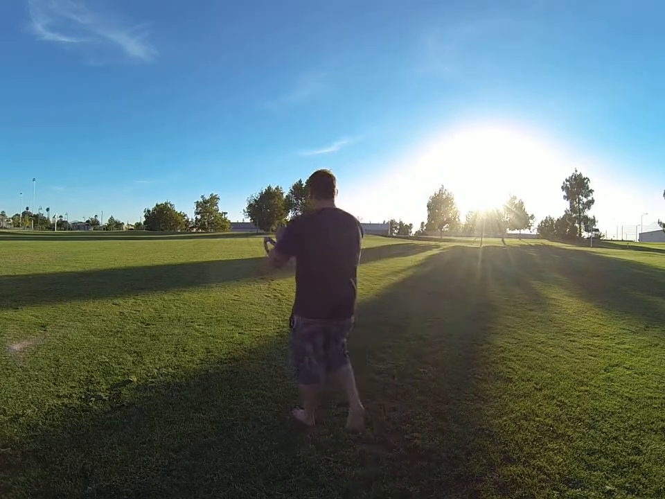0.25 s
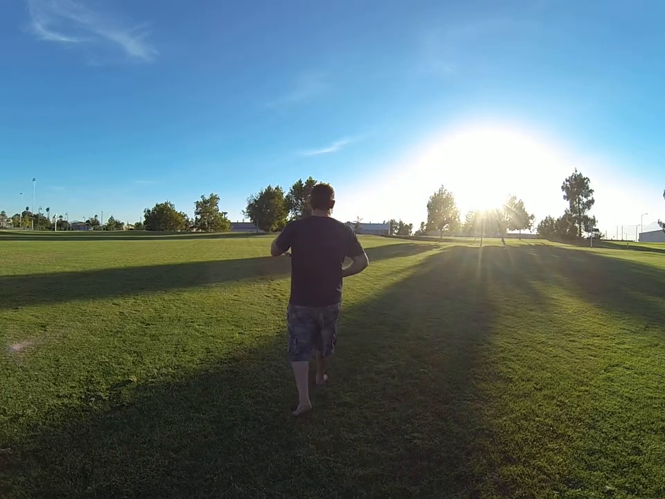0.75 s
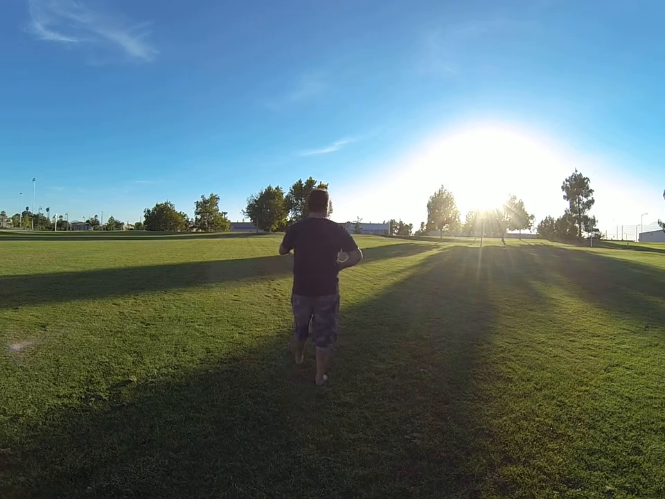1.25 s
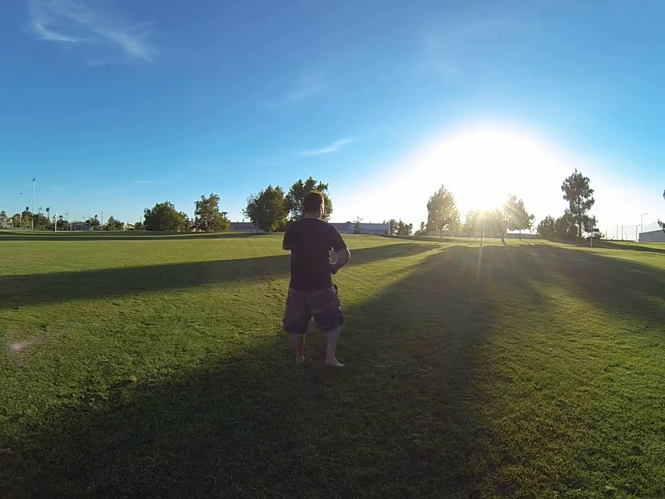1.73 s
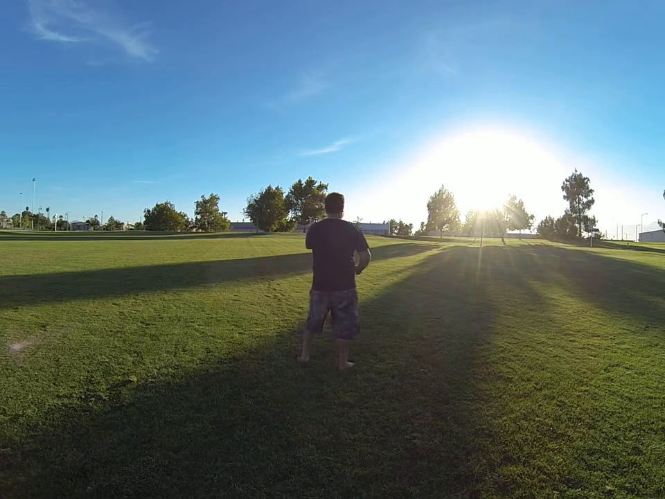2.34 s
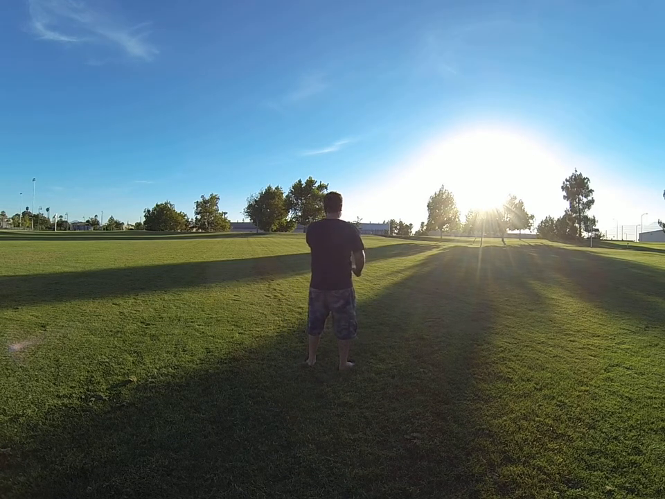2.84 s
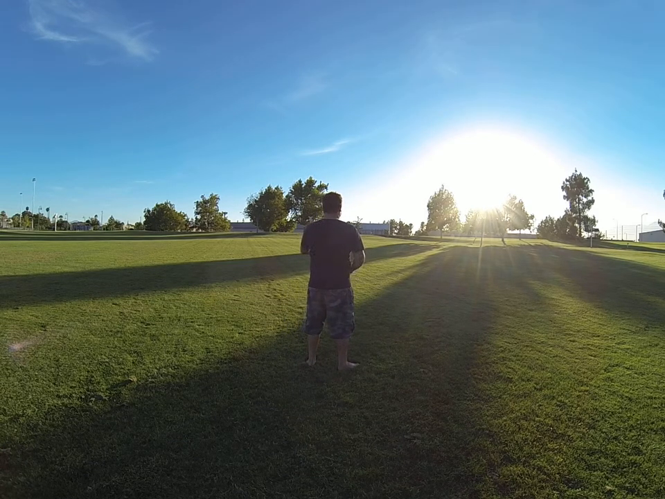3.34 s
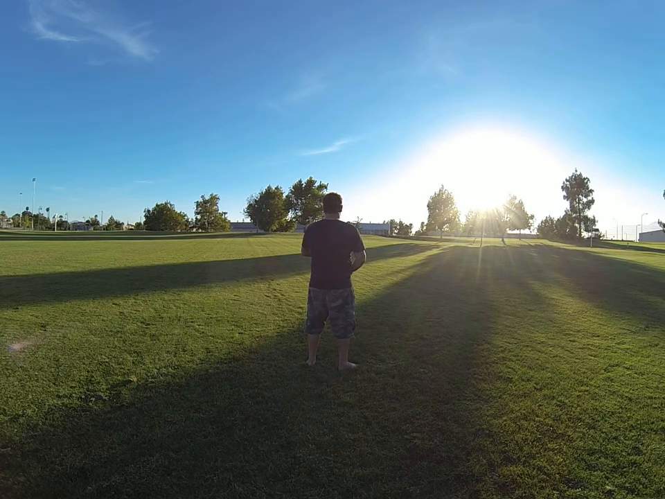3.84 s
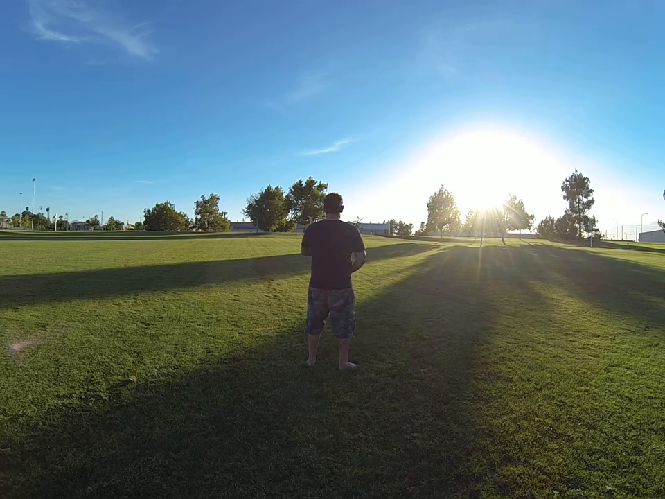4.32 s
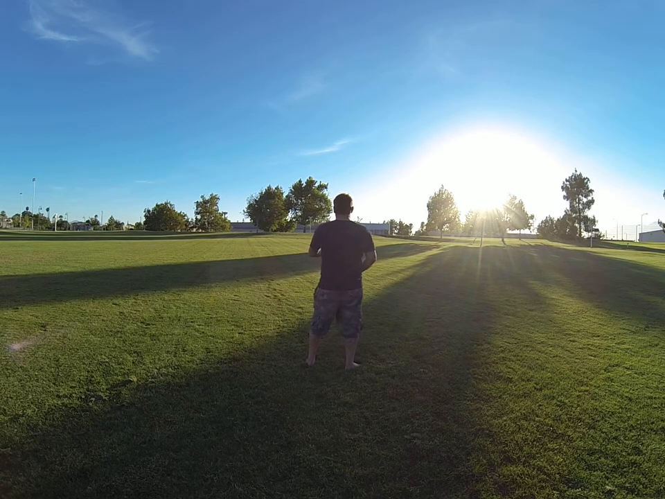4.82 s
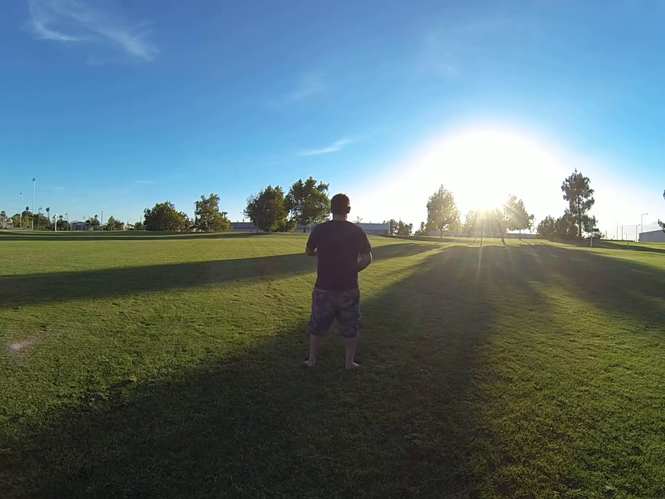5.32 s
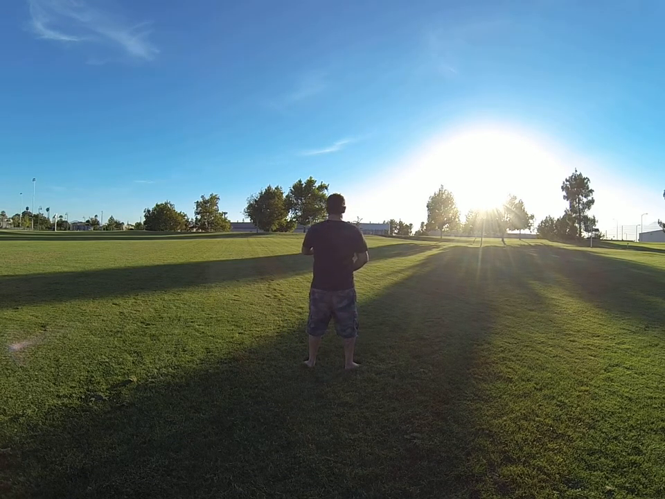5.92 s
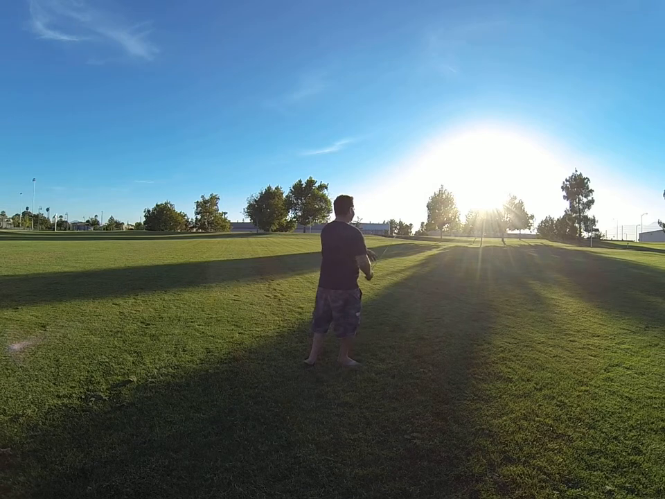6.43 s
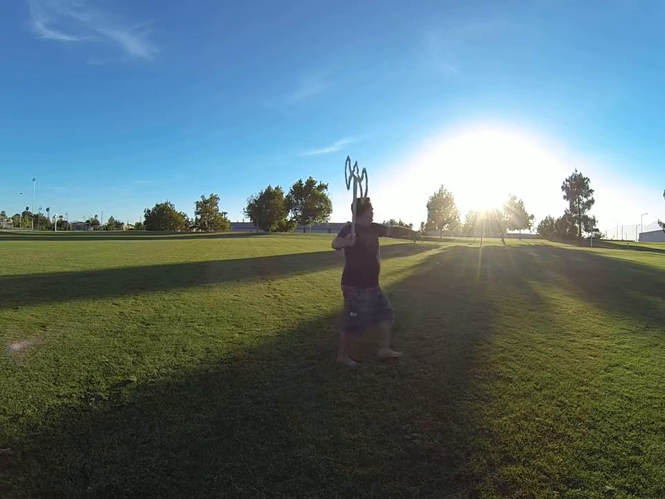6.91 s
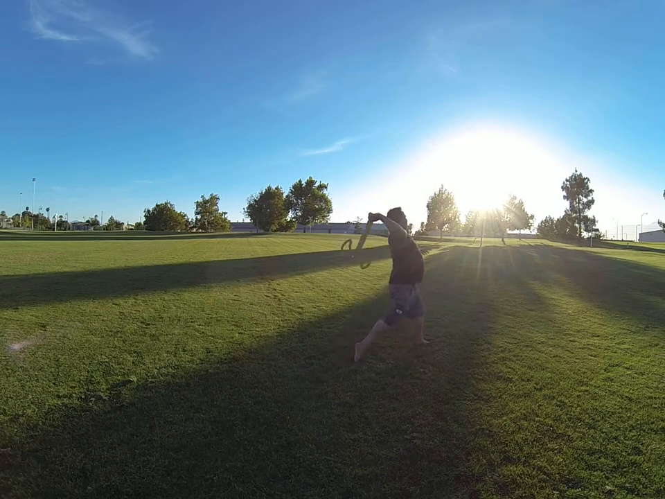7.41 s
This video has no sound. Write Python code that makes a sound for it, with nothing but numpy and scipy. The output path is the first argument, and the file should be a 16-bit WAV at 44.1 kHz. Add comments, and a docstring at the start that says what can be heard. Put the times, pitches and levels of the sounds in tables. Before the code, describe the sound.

A small fixed camera microphone in an open field picks up low wind rumble with soft knocks from the start; very faint grass rustles from footsteps come at about 0.4 to 1 s. From about 1 s the wind surges, with the strongest sharp thump near 1.3 s, more irregular bumps and a ragged flutter at 1.8 s, and buffeting until about 2.5 s. It then calms to a mild rumble over a distant road: dull tyre roar, airy hiss and low engine drones. A faint, rapidly pulsed high electronic whine runs throughout. Tiny insect chirps sound at 3.0, 4.6, 5.9 and 7.4 s; faint dry ticks at 3.3, 4.05 and 6.1 s. Traffic swells with thin singing tyre tones around 5.2 s and again after 7 s. Small wind bumps come at 6.1 and 6.5 s. At 7.6 s a very short, bright swish of a thrown toy ends it.

```python
"""Windy field beside a far road

A small camera stands in an open field; wind rumbles, thumps and flutters on its microphone as shaped noise and pulses.
Far off, a road roars with coloured noise for tyres and drifting sines for engines, while a truck pulls away.
Nearer, an insect chirps in decaying sines, feet brush the grass, something ticks and a thrown toy swishes.
The camera's own electronics leak a faint pulsed whine into the microphone."""
import sys
import numpy as np
from scipy.fft import rfft, irfft, next_fast_len
from scipy.io import wavfile
from scipy.ndimage import uniform_filter1d, map_coordinates

SR = 44100
rng = np.random.default_rng(int(sys.argv[2]) if len(sys.argv) > 2 else 0)


def store_wav(level_fs):
    """Save 16-bit WAV to argv[1]."""
    pcm = np.round(np.clip(np.atleast_2d(level_fs), -1, 1) * 32767)
    wavfile.write(sys.argv[1], SR, pcm.T.astype(np.int16))


N = 337806  # samples


def amp(db):
    """Amplitude of a level in dB."""
    return 10 ** (np.asarray(db) / 20)


def unit(x):
    """x scaled to rms 1."""
    return x / np.sqrt(np.mean(x ** 2) + 1e-20)


def curves(rows):
    """One value per sample for each column after the time."""
    times, *columns = np.transpose(rows)
    return [np.interp(np.arange(N) / SR, times, column) for column in columns]


def during(rows, fade=0.072):
    """1 between the first and last row, fading to 0 outside them over fade seconds."""
    t = np.arange(N) / SR
    inside = np.minimum(t - rows[0][0], rows[-1][0] - t)
    return np.clip(inside / fade + 1, 0, 1)


def wobble(rate):
    """A smooth random curve with rate knots a second."""
    knots = rng.standard_normal(int(N * rate / SR) + 4)
    return map_coordinates(knots, [np.arange(N) * rate / SR])


def filtered(x, response):
    """x shaped by a complex response of frequency."""
    m = next_fast_len(N + 8192)
    return irfft(rfft(x, m) * response(np.fft.rfftfreq(m, 1 / SR)), m)[:N]


def rush(spectrum):
    """Noise of rms 1 coloured by (frequency [Hz], relative level [dB]) points."""
    f, db = np.transpose(spectrum)

    def colour(hz):
        return amp(np.interp(np.log(hz + 1), np.log(f + 1), db, left=-120, right=-120))

    return unit(filtered(rng.standard_normal(N), colour))


def add(x, s, sound):
    """Mix a short sound into x at s seconds."""
    part = x[max(round(s * SR), 0):][:len(sound)]
    part += sound[:len(part)]


def swells(rows):
    """A sum of bell-shaped gains from (time [s], level [dB], half length [s])."""
    t = np.arange(N) / SR
    return sum(amp(db) * np.exp(-((t - s) / length) ** 2) for s, db, length in rows)


def tone(hz, db, drift_hz, waver_db, rate):
    """A sine on a pitch curve, made unsteady by the air it crosses."""
    turn = 2 * np.pi * np.cumsum(hz + drift_hz * wobble(rate)) / SR
    level = amp(db + waver_db * wobble(rate))
    return np.sqrt(2) * level * np.sin(turn + rng.uniform(0, 2 * np.pi))


def glide(row, drift_hz, waver_db, rate):
    """A fuzzy tone that swells and fades while its pitch slides."""
    start, loudest, end, first_hz, last_hz, db = row
    hz, = curves([(start, first_hz), (end, last_hz)])
    ends_db = db - 10
    level = [(start, ends_db), (loudest, db), (end, ends_db)]
    return during(level) * tone(hz, curves(level)[0], drift_hz, waver_db, rate)


def wind():
    """Turbulence at the microphone in three sizes of eddy; the small ones come in lumps."""
    # gusts: (time [s], deep rumble level [dB], buffet level [dB])
    gusts = [(0, -34, -37), (.14, -40, -42.5), (.19, -34.5, -29.5), (.24, -36, -36.5), (.42, -38.5, -36.5),
             (.6, -32, -38), (.77, -46, -40.5), (1.0, -28.5, -33.5), (1.12, -40, -40.5), (1.29, -23.5, -33),
             (1.5, -33.5, -32.5), (1.62, -28, -32), (1.69, -30, -30), (1.82, -24.5, -29), (1.9, -35.5, -35),
             (1.96, -27, -27.5), (2.08, -32.5, -29), (2.14, -34, -35), (2.22, -28, -31.5),
             (2.38, -37.5, -36.5), (2.47, -26.5, -35), (2.56, -35.5, -33.5), (2.7, -31.5, -33.5),
             (2.86, -37, -39), (3.35, -36, -39), (3.7, -41.5, -39), (4.4, -41.5, -39.5), (4.7, -48, -38),
             (5.1, -39.5, -39), (5.9, -41, -35), (6.3, -42, -37), (6.55, -35.5, -35.5), (7.25, -46.5, -39),
             (7.45, -39, -36), (7.6, -32, -34.5)]
    # spectra of large, middle and small eddies: (frequency [Hz], relative level [dB])
    deep_spectrum = [(4.7, -39), (8.0, -5.5), (32, 5), (60, 1), (86, -13), (110, -3.5), (140, -38),
                     (240, -120)]
    buffet_spectrum = [(40, -29.5), (70, 2), (120, 0.5), (170, -9), (230, -15), (300, -42)]
    edge_spectrum = [(170, -28), (230, -0.5), (320, -1), (480, -13), (800, -26)]
    calm_db, edge_calm_db = -33, -59.5
    edge_grows = 3.6  # dB of edge per dB of buffet above calm

    deep_db, buffet_db = curves(gusts)
    slow = rush(deep_spectrum)
    size = uniform_filter1d(abs(slow), size=SR // 8)
    evened = slow / size ** 0.53  # the gust sets the size of the slow swings
    deep = amp(deep_db) * unit(amp(3.0 * wobble(14)) * evened)
    lumps = wobble(18)
    buffet = amp(buffet_db) * unit(amp(1.86 * lumps) * rush(buffet_spectrum))
    edge_db = edge_calm_db + edge_grows * np.maximum(buffet_db - calm_db, 0)
    edge = amp(edge_db) * unit(amp(0.86 * lumps + 1.9 * wobble(45)) * rush(edge_spectrum))
    return deep + buffet + edge


def thumps():
    """Single eddies on the membrane: a sharp pressure swing between soft shoulders of the other sign."""
    # eddies: (time of peak [s], relative size [dB], half width [ms], push 1 or pull -1)
    eddies = [(0.143, -20, 2.5, 1), (0.198, -21, 5, 1), (.602, -19.5, 3.6, 1), (.965, -17.5, 3.6, -1),
              (0.993, -16.5, 1.9, -1), (1.008, -15.5, 4.8, 1), (1.035, -16, 1.66, -1), (1.26, -20, 3, -1),
              (1.2777, -5.5, 1.02, -1), (1.283, -13.5, 0.95, -1), (1.292, -11.5, 3.1, 1),
              (1.314, -23, 3.2, 1), (1.3263, -9, 1.47, -1), (1.4, -17, 2.4, -1), (1.462, -21, 1.8, -1),
              (1.472, -14.5, 2.7, -1), (1.51, -24, 2.5, -1), (1.571, -17, 2.4, -1), (1.746, -21, 1.2, 1),
              (1.788, -23, 1.9, -1), (1.801, -21, 0.42, -1), (1.816, -16, 0.67, 1), (1.822, -24, 1.7, -1),
              (1.828, -20, 0.84, -1), (1.873, -16.5, 2.3, 1), (1.959, -21, 4, -1), (1.976, -16, 2, 1),
              (1.9854, -19, 1.2, 1), (1.9925, -13, 1.24, -1), (1.995, -15.5, 0.72, 1),
              (1.9996, -14.5, 0.95, 1), (2.017, -20, 2.2, -1), (2.029, -21, 0.83, -1), (2.07, -22, 2.1, 1),
              (2.149, -15.5, 2.2, -1), (2.221, -24, 2.7, 1), (6.075, -23.5, 2.4, -1),
              (6.545, -21.5, 2.8, -1), (6.628, -27, 1.04, -1)]
    x, t = np.zeros(N), np.arange(-SR // 25, SR // 25) / SR
    for s, db, ms, sign in eddies:
        u = t * 1000 / ms
        swing = .9 / np.cosh(u * np.arccosh(2)) + .1 / np.cosh(u * 4)  # a pointed tip
        shoulders = np.exp(-(u / 4) ** 2)
        balanced = swing - shoulders * swing.sum() / shoulders.sum()  # no net pressure
        add(x, s - 1 / 25, amp(db + 2.5) * np.sign(sign) * balanced)
    return x


def flutters():
    """The membrane flutters in shed vortices: a ragged oscillation that speeds up and drops back."""
    # flutter: (start [s], length [s], first, top and last pitch [Hz], level before wavering [dB])
    vortices = [(1.769, .075, 90, 175, 90, -14)]
    x, uneven, sizes = np.zeros(N), wobble(90), wobble(110)
    for s, length, first_hz, top_hz, last_hz, db in vortices:
        u = np.arange(round(length * SR)) / (length * SR)
        at = slice(round(s * SR), round(s * SR) + len(u))
        hz = np.interp(u, [0, .5, .65, 1], [first_hz, top_hz, last_hz, last_hz])
        turn = 2 * np.pi * np.cumsum(hz * amp(1.2 * uneven[at])) / SR
        shape = np.sin(turn) + 0.091 * np.sin(2 * turn + 1.4) + 0.058 * np.sin(3 * turn)
        fade = np.clip(np.minimum(u, 1 - u) / .12, 0, 1)
        add(x, s, amp(db + 2.2 * sizes[at]) * fade * shape)
    return x


def road():
    """Far tyre roar, tread noise, hiss and fuzzy tones over the rustle of the field."""
    # traffic: (time [s], tyre roar level [dB], truck hiss level [dB])
    traffic = [(0, -51, -64.5), (.55, -51.5, -64.5), (1.05, -50.5, -61), (1.35, -50.5, -62),
               (1.7, -50.5, -60.5), (2.44, -49.5, -64), (2.75, -52, -64), (3.87, -50, -63.5),
               (4.5, -49.5, -60), (5.2, -46.5, -57), (5.8, -49.5, -59.5), (6.8, -49.5, -58.5),
               (7.18, -47.5, -54), (7.56, -45, -57.5)]
    # spectra of roar, tread, two hisses and rustle: (frequency [Hz], relative level [dB])
    roar_spectrum = [(250, -34.5), (420, -7), (525, -5.5), (584, -0.5), (1050, -1.5), (1360, -35),
                     (2310, -120)]
    tread_spectrum = [(620, -26.5), (1050, -4.5), (1130, 1), (1700, -10), (2210, -38.5), (3740, -120)]
    hiss_spectrum = [(1000, -29.5), (1700, -4), (2300, -5), (2900, -9.5), (3150, -13), (4000, -41)]
    high_spectrum = [(2200, -31), (2900, -11.5), (3200, -2.5), (3900, -4.5), (5000, -7.5), (5300, -12.5),
                     (6700, -39)]
    rustle_spectrum = [(2940, -41.5), (5000, -12), (5870, -12), (6520, -9.5), (7050, -8.5), (9680, -18),
                       (12200, -21), (12500, -21.5), (13300, -18), (13700, -39), (15000, -52)]
    # a passing car adds to the tread: (time [s], added share [dB], half length [s])
    tread_swells = [(1, -10.5, 0.28), (7.35, -11, 0.14)]
    # the high hiss swells: (time [s], level [dB], half length [s])
    high_swells = [(4.6, -71, .4), (5.2, -63, 0.39), (7.18, -66.5, 0.18), (7.56, -64, 0.11)]
    # a turbine, then singing tyres: (start [s], loudest [s], end [s], first and last pitch [Hz], level [dB])
    turbine = (3.4, 5.1, 5.75, 4590, 5060, -75.5)
    singing_tyres = [(4.6, 5.25, 5.5, 2110, 2290, -63), (4.9, 5.42, 5.52, 3090, 3260, -67),
                     (6.95, 7.08, 7.35, 2690, 2720, -65), (7, 7.12, 7.35, 3660, 3700, -74)]
    mean_tread_db, tread_follows = -54, .7  # level at the mean roar; share of the roar's swings
    high_db, rustle_db = -70, -74

    roar_db, hiss_db = curves(traffic)
    tread_db = mean_tread_db + tread_follows * (roar_db - roar_db.mean())
    tread_db += 20 * np.log10(1 + swells(tread_swells))
    x = amp(roar_db + 0.3 * wobble(7)) * rush(roar_spectrum)
    x += amp(tread_db + .6 * wobble(8)) * rush(tread_spectrum)
    x += amp(hiss_db + 0.53 * wobble(9)) * rush(hiss_spectrum)
    high_level = np.hypot(amp(high_db), swells(high_swells))
    x += high_level * amp(0.67 * wobble(13)) * rush(high_spectrum)
    x += amp(rustle_db + .6 * wobble(8)) * rush(rustle_spectrum)
    x += glide(turbine, 15, 3, 60)
    return x + sum(glide(row, 130, 3.5, 250) for row in singing_tyres)


def engines():
    """Only the strongest low orders of each distant engine's firing rate carry across the field."""
    # engines: (firing rate curve (time [s], rate [Hz]), level curve (time [s], level [dB]),
    #           orders (multiple of the rate, relative level [dB]))
    motors = [ ([(0, 82), (1.9, 88), (4.7, 91), (7.66, 91)], [(0, -53), (1.5, -42), (5.5, -40.5),
              (6.2, -46), (6.7, -42), (7.66, -42)], [(1, 0)]), ([(3.1, 43.4), (6.3, 49.7), (7.66, 51.5)],
              [(3.1, -66), (3.6, -45.5), (4.4, -40.5), (5.9, -46.5), (7.66, -42.5)], [(3, 0), (4, -12.5)]),
              ([(0, 55), (4.4, 55.3)], [(0, -62.5), (1.8, -43.5), (3.1, -53), (4.4, -53)], [(2, 2), (3, -5),
              (4, -14)]), ([(0, 64.5), (.65, 65.5)], [(0, -39.5), (.5, -43), (.65, -51)], [(2, 4.5),
              (3, -9), (4, -23.5)])]
    x = np.zeros(N)
    for speed, level, orders in motors:
        hz, level_db = curves(speed)[0], curves(level)[0]
        for multiple, db in orders:
            x += during(level) * tone(multiple * hz, level_db + db, .6, 1.5, 7)
    return x


def swish():
    """A thrown toy cuts the air: a rush that holds briefly, with a shorter treble peak just ahead."""
    # body, then treble: (peak level [dB], rise [dB per s], fall [dB per s])
    body_peak = (-37.5, 370, 1100)
    treble_peak = (-51.5, 1500, 2500)
    # their spectra: (frequency [Hz], relative level [dB])
    body_spectrum = [(250, -3.5), (500, -12), (900, -1.5), (1300, -9.5), (1550, -5), (2050, -17),
                     (2450, -6.5), (2900, -21), (4000, -20), (7000, -30), (9000, -63)]
    treble_spectrum = [(4000, -44), (6800, -18), (7970, 0), (10300, -14), (11200, -14), (15000, -36)]
    body_s, treble_s, half_hold_s = 7.618, 7.612, .012
    t = np.arange(N) / SR

    def peak(s, hold, db, rise, fall):
        below = np.maximum(rise * (s - hold - t), fall * (t - s - hold))
        return amp(db - np.maximum(0, below))

    body = peak(body_s, half_hold_s, *body_peak) * rush(body_spectrum)
    return body + peak(treble_s, half_hold_s / 5, *treble_peak) * rush(treble_spectrum)


def chirps():
    """An insect's short chirps, each ringing down on one pitch after a soft onset."""
    # chirps: (start [s], level before the onset softens it [dB], pitch [Hz], time to fall 60 dB [s])
    calls = [(3.012, -47.5, 3530, 0.045), (3.013, -57, 2600, .03), (4.56, -62, 4800, .06),
             (5.0, -69, 4830, .06), (5.937, -48, 4760, .03), (5.949, -51, 4750, .04),
             (5.973, -67, 4700, .04), (7.393, -61, 4830, 0.088), (7.458, -56, 4830, .05),
             (7.494, -59, 4700, .03)]
    x, t = np.zeros(N), np.arange(SR // 8) / SR
    for s, db, hz, t60 in calls:
        onset = 1 - np.exp(-t / 0.00098)
        add(x, s, amp(db - 60 * t / t60) * onset * np.sin(2 * np.pi * hz * t))
    return x


def ticks():
    """Dry blows ring a few broad modes; distance dulls their treble."""
    # blows: (time [s], relative size [dB])
    blows = [(3.2574, -43), (3.271, -52), (4.05, -55), (6.07, -46), (6.072, -45.5), (6.08, -52)]
    # modes of the struck body: (centre [Hz], width [Hz], relative level [dB])
    modes = [(1200, 500, 2), (2300, 900, 0), (3300, 1100, 0), (4500, 1200, -5), (6000, 1000, -9)]
    x, t = np.zeros(N), np.arange(200) / SR
    for s, db in blows:
        click = 1.8 * (t == 0) + 0.37 * rng.standard_normal(200)
        add(x, s, amp(db + 26 - 60 * t / 0.0055) * click)

    def body(f):
        return sum((-1) ** k * amp(db) * 1j * f * w / (c * c - f * f + 1j * f * w)
                   for k, (c, w, db) in enumerate(modes))

    def distance(f):
        return 1 / (1 + 1j * f / 5600) ** 4

    return filtered(x, lambda f: body(f) * distance(f))


def steps():
    """Feet in grass: each step is a short swell of crackly rustle."""
    # feet: (time [s], level [dB], half length [s])
    feet = [(.36, -79, .03), (.4, -76, .02), (0.618, -69, .05), (.7, -71, .05), (1.0, -77, .04)]
    # grass: (frequency [Hz], relative level [dB])
    grass = [(3000, -30), (4500, 2), (7500, 0), (11000, -12), (13000, -30)]
    return swells(feet) * unit(amp(4 * wobble(150)) * rush(grass))


def whine():
    """Each sensor read-out leaks a flat burst of its line rate, its phase shifting at random from burst to
    burst, with a spit of hiss."""
    burst_hz, line_hz = 47.952, 6444
    cycles = np.arange(N) / SR * burst_hz
    count = np.floor(cycles).astype(int)
    off_centre = abs(cycles - count - .355)
    gate = np.clip((.205 - off_centre) / 0.0095, 0, 1)
    slips = .75 * rng.standard_normal(count[-1] + 1)[count]  # radians, one draw a burst
    since_restart = (cycles % 2) / burst_hz  # the pattern restarts every second burst
    turn = 2 * np.pi * line_hz * since_restart + slips - .85 * (count % 2)
    spit_shape = np.exp(-((cycles - count - .14) / .05) ** 2)
    spit = spit_shape * rush([(6500, -20), (7500, -1), (9000, -7), (10000, -23)])
    return gate * (amp(-60.5) * np.sin(turn) + amp(-74.0) * np.sin(2 * turn)) + amp(-71) * spit


def scene():
    """Everything that reaches the microphone, and the leaked whine, on one channel."""
    on_microphone = wind() + thumps() + flutters()
    far = road() + engines()
    near = swish() + chirps() + ticks() + steps()
    return (on_microphone + far + near + whine())[None]


def record(dry):
    """The camera keeps nothing above its band limit."""
    top_hz = 15170
    return filtered(dry[0], lambda hz: hz < top_hz)[None]


dry = scene()
out = record(dry)
store_wav(out)
```